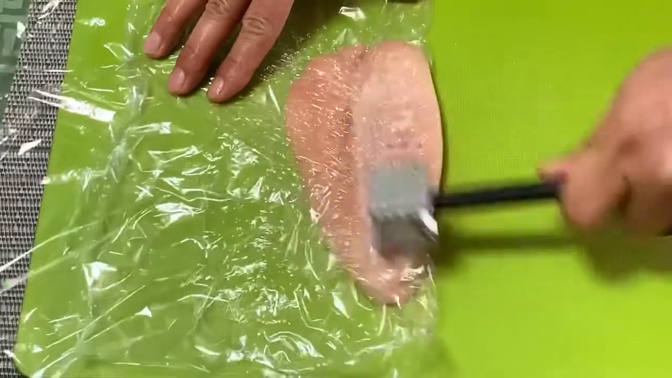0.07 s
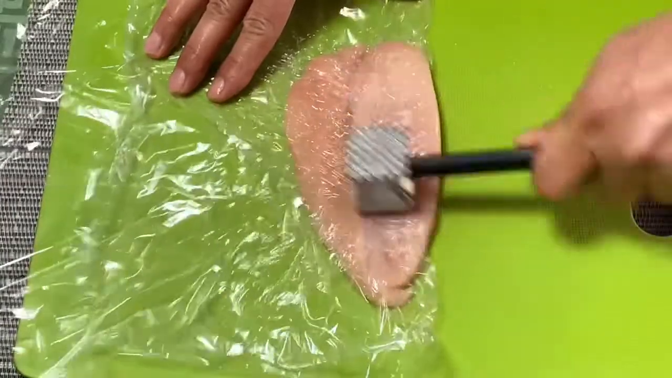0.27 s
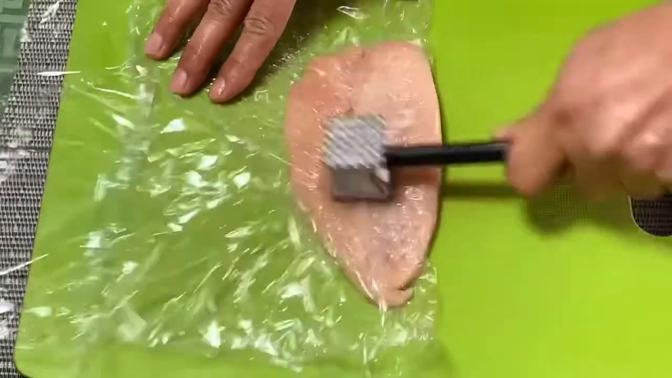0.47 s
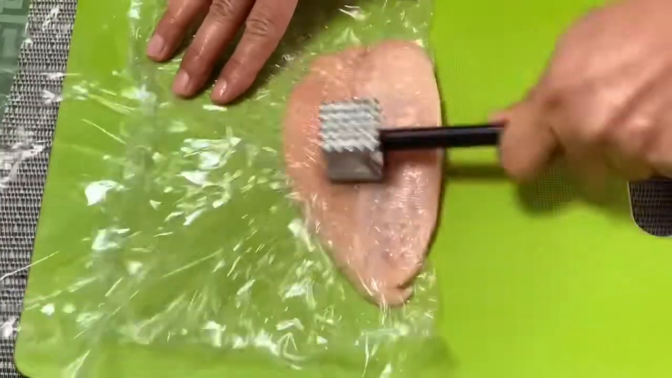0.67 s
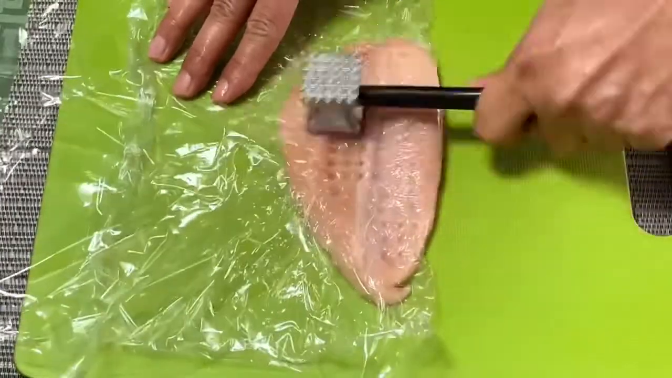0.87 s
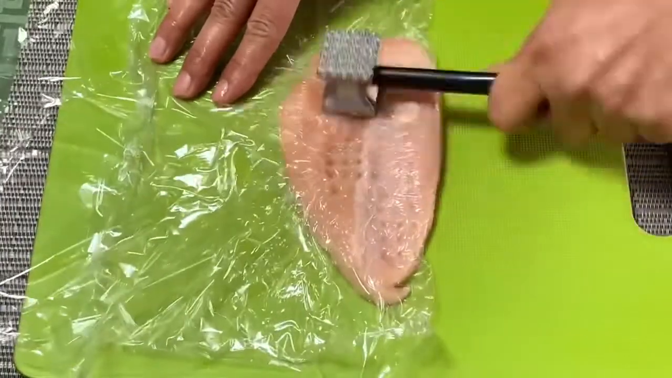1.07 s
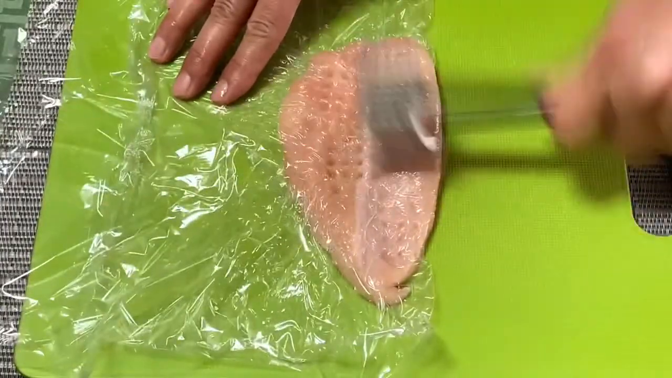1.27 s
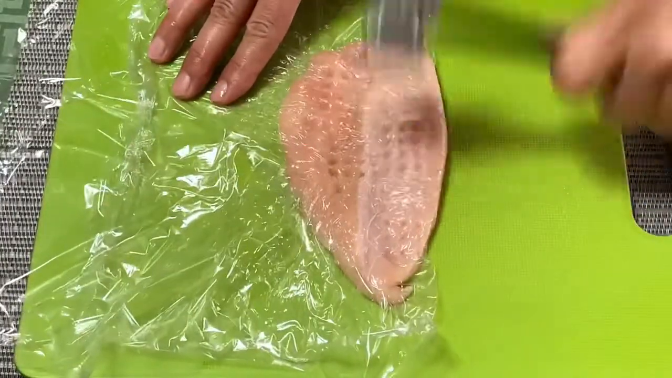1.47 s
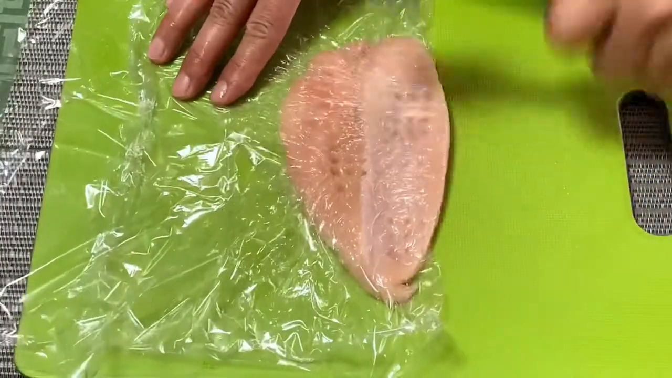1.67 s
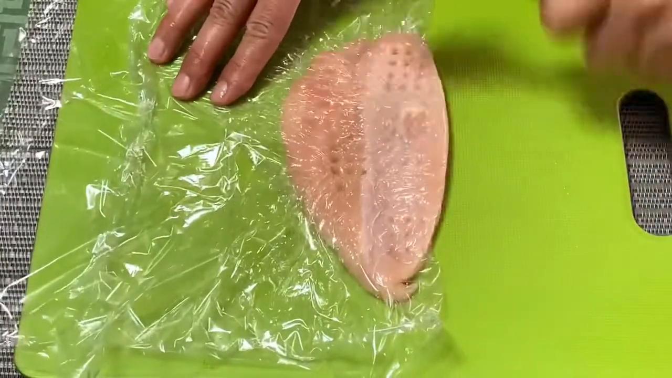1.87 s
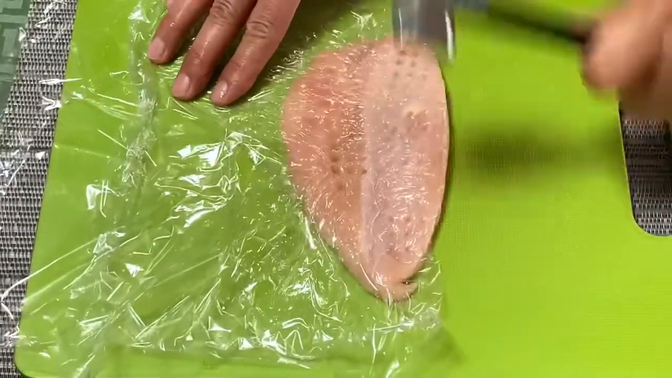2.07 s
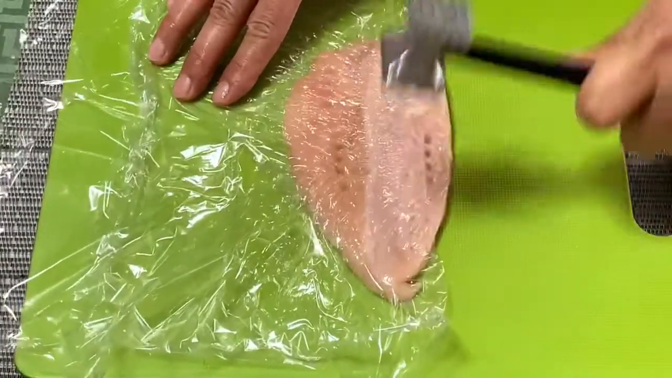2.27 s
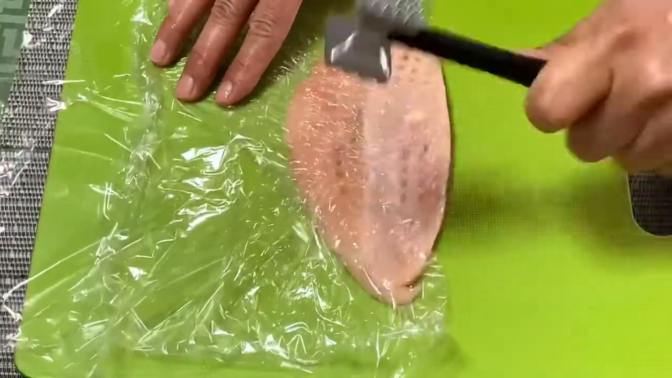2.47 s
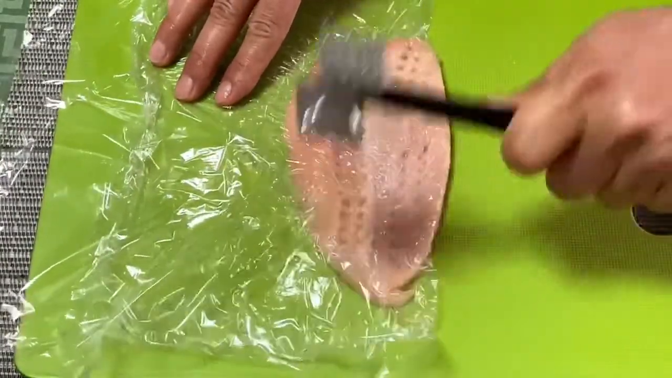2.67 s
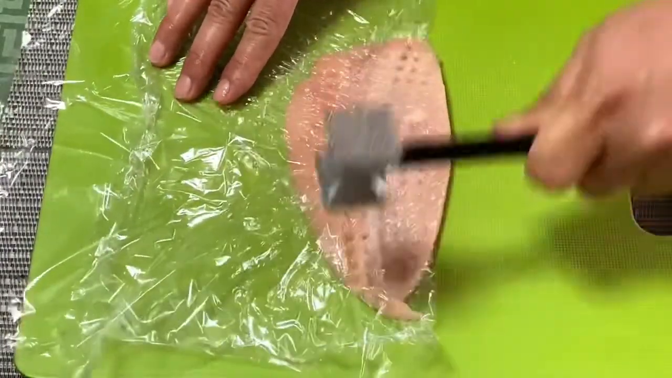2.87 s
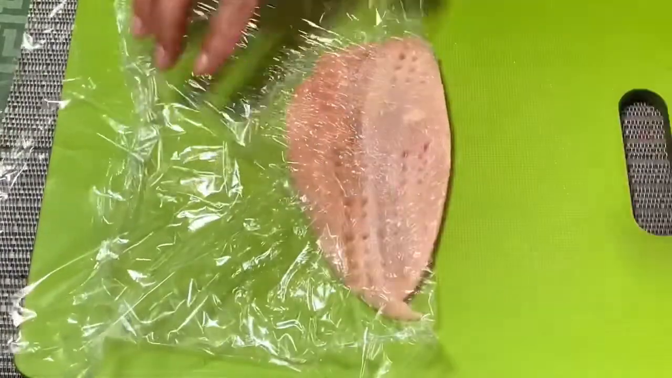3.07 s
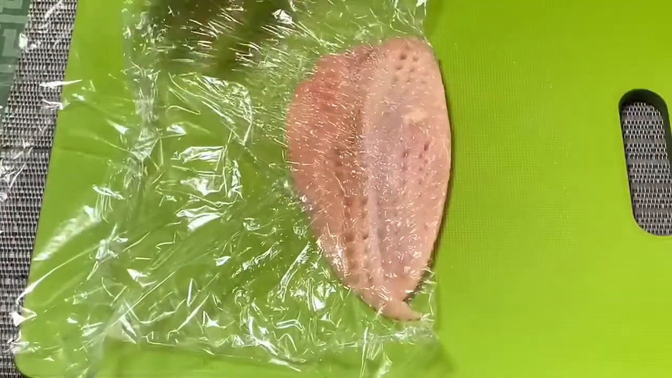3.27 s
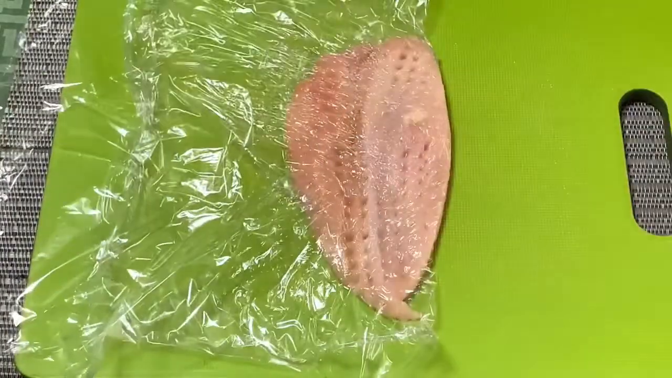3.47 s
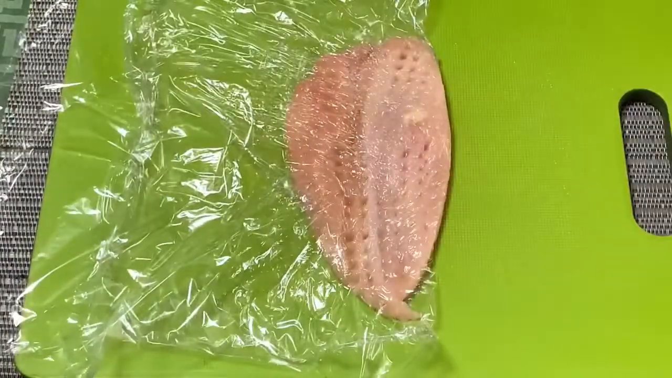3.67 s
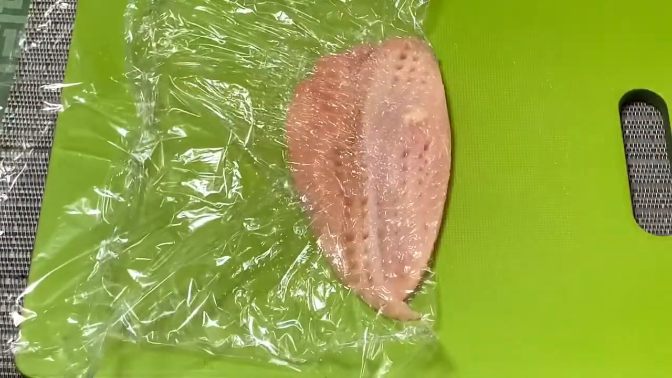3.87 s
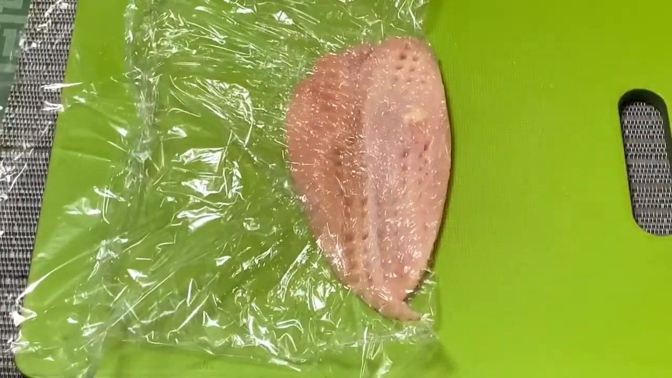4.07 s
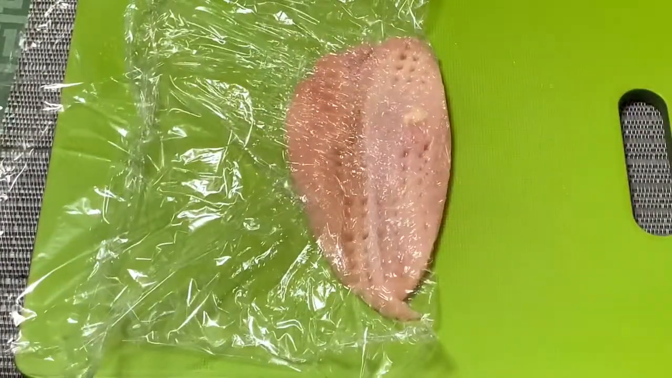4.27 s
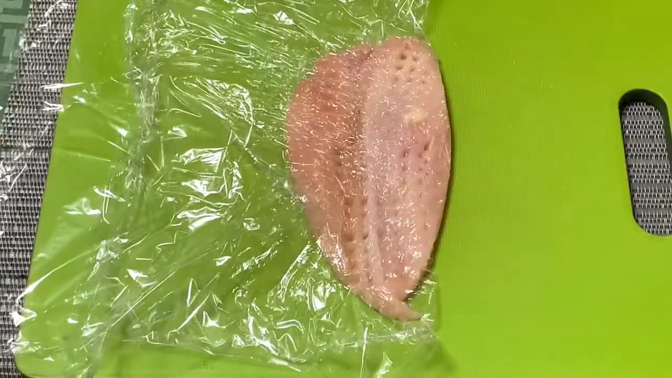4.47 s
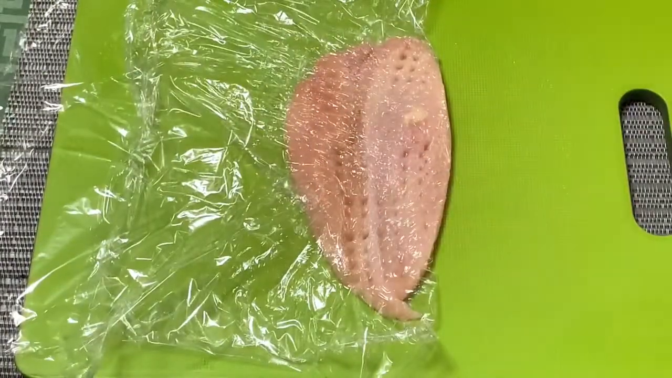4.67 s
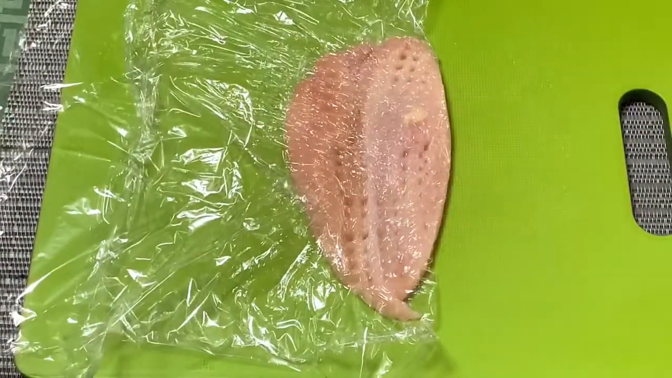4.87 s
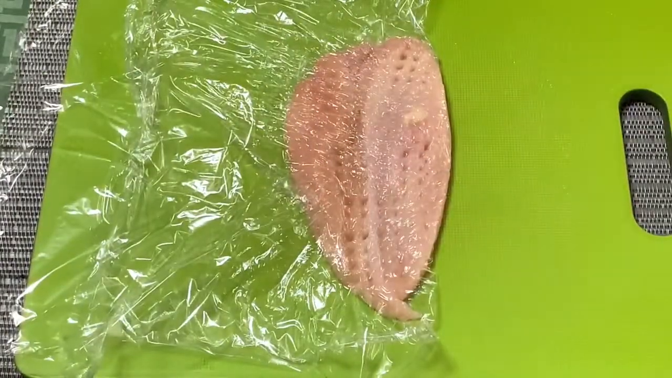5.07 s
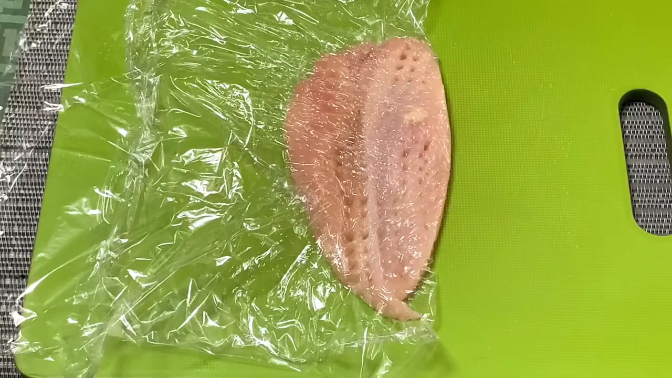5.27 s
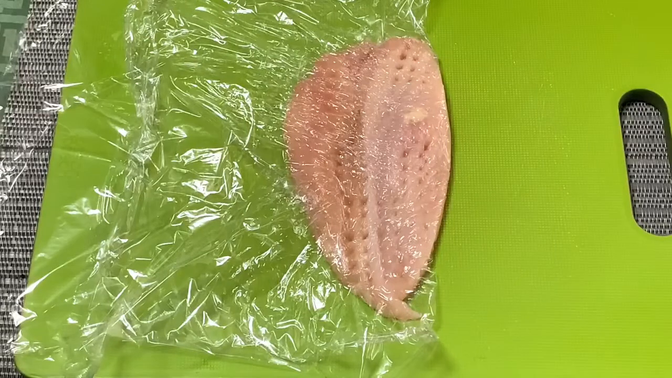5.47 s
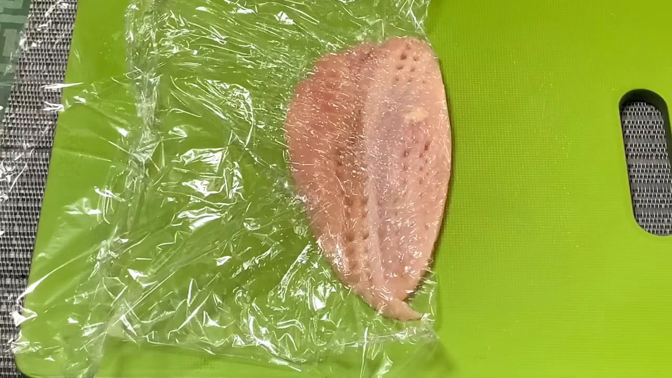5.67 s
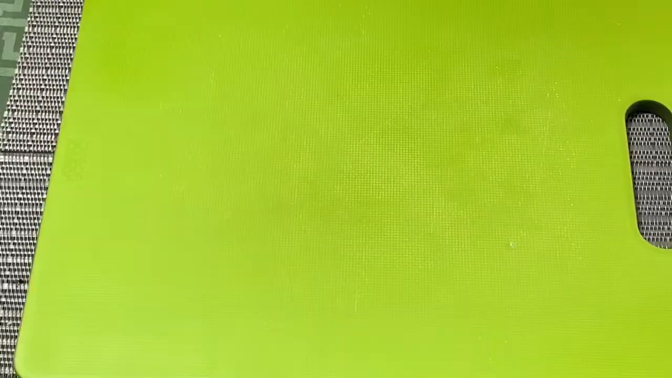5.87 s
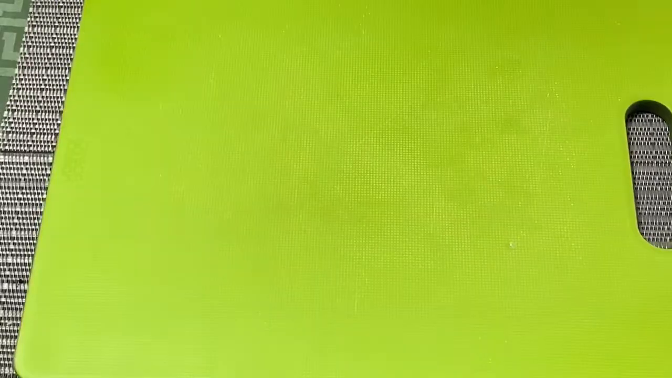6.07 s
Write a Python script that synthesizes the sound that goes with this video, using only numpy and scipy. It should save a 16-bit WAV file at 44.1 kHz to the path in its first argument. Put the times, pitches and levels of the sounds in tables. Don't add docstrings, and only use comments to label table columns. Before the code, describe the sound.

A metal mallet pounds raw chicken under plastic film on a plastic board, booming steadily, then stops, leaving faint hum, rustling and small snaps.

```python
import sys
import numpy as np
from scipy import signal
from scipy.fft import rfft, irfft
from scipy.io import wavfile
from scipy.ndimage import uniform_filter1d

SR = 44100
rng = np.random.default_rng(int(sys.argv[2]) if len(sys.argv) > 2 else 0)


def wav_out(sig):
    wavfile.write(sys.argv[1], SR, np.round(np.clip(np.atleast_2d(sig).T, -1, 1) * 32767).astype(np.int16))


def decibels_to_gain(level_db):
    exponent = np.asarray(level_db, float) / 20
    return 10 ** exponent


N = 269450
LEAD, TAIL = 2048, 24000
SMACK_PEAK_S = 0.02


def unit(x):
    return x / np.sqrt(np.mean(x ** 2))


def shape(x, db_of):
    size = x.shape[-1]
    hz = np.maximum(np.fft.rfftfreq(size, 1 / SR), 1)
    return irfft(rfft(x) * decibels_to_gain(db_of(hz)), size)


def along(table, column=1):
    rows = np.array(table)
    return lambda hz: np.interp(np.log(hz), np.log(rows[:, 0]), rows[:, column])


def bell(centre_hz, width_hz):
    return lambda hz: -10 * np.log10(1 + (2 * (hz - centre_hz) / width_hz) ** 4)


def fade(t, t60_s):
    return np.exp(-np.log(1000) * t / t60_s)


def walk(rate_hz):
    k = int(SR / rate_hz)
    steps = np.repeat(rng.standard_normal(N // k + 1), k)
    smooth = uniform_filter1d(uniform_filter1d(steps, k), k)
    return unit(smooth[:N])


def add(out, sound, start_s):
    i = LEAD + int(start_s * SR)
    out[:, i:i + sound.shape[-1]] += sound


def ports(common, opposite, share):
    return np.array([common + share * opposite, common - share * opposite])


def ring(modes, t, scatter_db, delay_s, swell_s, punch=0., turn=0.):
    hz, db, t60_s = np.transpose(modes)[:, :, None]
    detune, scatter, offset = rng.standard_normal((3, len(modes), 1))
    age = np.maximum(t - delay_s, 0)
    phase = 2 * np.pi * hz * (1 + 0.006 * detune) * age
    size = decibels_to_gain(db + scatter_db * scatter) * fade(age, t60_s)
    mid = (size * np.sin(phase)).sum(axis=0)
    side = (size * offset * np.cos(phase)).sum(axis=0)
    early = 1 + punch * fade(age, 0.067)
    return ports(mid, side, turn) * (1 - np.exp(-age / swell_s)) * early


def follow(rule, boom_db, board_db, smack_db):
    usual_boom_db, usual_board_db, usual_smack_db = -8, -8, -7
    departure_db = [boom_db - usual_boom_db, board_db - usual_board_db, smack_db - usual_smack_db]
    return rule[0] + np.dot(rule[1:], departure_db)


def answer(t):
    # hz, level_db_per_hz, t60_s, side_share
    kitchen = [(204.4, 0.5, 0.45, 0.084), (523, -0.5, 0.32, 0.5), (920, -11.5, 0.34, 1),
               (1860, -22.5, 0.33, 0.733), (3700, -24, 0.26, 1), (7270, -30, 0.34, 1),
               (9850, -35, 0.22, 0.44), (15070, -45, 0.25, .9)]
    out = np.zeros((2, len(t)))
    for hz in 210 * 2 ** np.arange(0, 6.3, .5):
        mid, side = unit(shape(rng.standard_normal((2, len(t))), bell(hz, hz * 0.51)))
        both = ports(mid, side, along(kitchen, column=3)(hz))
        level = decibels_to_gain(along(kitchen)(hz)) * np.sqrt(hz / 500)
        out += level * fade(t, along(kitchen, column=2)(hz)) * both
    return out


def blow(stroke, landing, slap_hz, low_tail, high_tail):
    # hz, level_db, t60_s
    low_modes = [(129, -32.5, 0.26), (144.3, 0, 0.31)]
    # hz, level_db, t60_s
    cabinet_modes = [(41, -3.5, 0.18), (56, 2, 0.1695)]
    # hz, level_db, t60_s
    second_modes = [(183.1, -2, 0.37), (205.5, -1, 0.2), (235.9, -13, 0.31)]
    # hz, level_db, t60_s
    knock_modes = [(283, -2, 0.135), (311, -2.5, 0.21), (331.2, 2, 0.13), (350.6, -5.5, 0.31),
                   (400, -4, 0.2), (457, 0, 0.13)]
    # hz, level_db, t60_s
    board_modes = [(441.6, 5, 0.14), (489, -24.5, 0.17), (532.5, -3, 0.2), (569, -7.5, 0.081),
                   (633, -4, 0.2), (690.7, -3.5, 0.18), (805, -18, 0.083), (830, -20, 0.089),
                   (881, -6, 0.13)]
    thud_lag_s, scatter_db = .0006, 2.5
    bend_hz, bend_s = 2470, .0017

    _, boom_db, smack_db, smack_hz, slap_db = stroke
    board_db, chirp_db = landing[:2]
    second_db = follow((-8.5, 0.48, 0.41, -0.15), boom_db, board_db, smack_db)
    knock_db = follow((-10, 1.04, 0.63, -0.51), boom_db, board_db, smack_db)
    crackle_db = follow((-33.5, 0.25, 0.19, 0.21), boom_db, board_db, smack_db)

    t = np.arange(TAIL) / SR
    since_peak = t - SMACK_PEAK_S
    noise = rng.standard_normal((3, TAIL))
    squeeze = np.where(since_peak < 0, np.exp(since_peak / 0.00061), fade(since_peak, 0.007))
    squirt = unit(shape(noise[:2], bell(smack_hz, 1400)))
    squirt = squirt + .5 * unit(shape(noise[:2], bell(8834, 10000)))
    film = decibels_to_gain(smack_db - 7.5) * squeeze * ports(squirt[0], squirt[1], 1.0)
    lead_swell = (since_peak < 0) * np.exp(np.minimum(since_peak, 0) / 0.0046)
    faint_lead = lead_swell * unit(shape(noise[1::-1], bell(4010, 5500)))
    film = film + decibels_to_gain(smack_db - 24.5) * faint_lead

    push = np.maximum(since_peak - thud_lag_s, 0)
    turns = low_modes[-1][0] * push + bend_hz * bend_s * (1 - np.exp(-push / bend_s))
    sharp = decibels_to_gain(chirp_db - 26) * (1 - np.exp(-push / 0.0019)) * fade(push, .03)
    heavy = decibels_to_gain(boom_db + 15) * (1 - np.exp(-push / 0.0043)) ** 2 * fade(push, 0.029)
    chirp = np.sin(2 * np.pi * turns) * (sharp + heavy)

    age = np.maximum(since_peak + .001, 0)
    wet = unit(shape(noise[2], bell(slap_hz, 2300)))
    slap = decibels_to_gain(slap_db + 5) * fade(age, 0.033) * (1 - np.exp(-age / 0.0006)) * wet

    late = since_peak - thud_lag_s + .003
    counter = decibels_to_gain(boom_db + 8) * ring(low_modes, late, 1.07, .0089, .0035, 0.44, .05)
    counter += decibels_to_gain(boom_db - 5) * ring(cabinet_modes, late, 1.2, 0.015, 0.0052)
    counter += decibels_to_gain(second_db + 2.0) * ring(second_modes, late, 2.64, .0042, 0.0039, 0.64, 0.1)
    counter += decibels_to_gain(knock_db - 3.5) * ring(knock_modes, late, scatter_db, .0059, 0.0035, 2.26, 0.21)
    counter += decibels_to_gain(board_db - 8.0) * ring(board_modes, late, scatter_db, .0044, 0.0009, 1.53, 0.54)

    clusters = np.repeat(rng.exponential(size=TAIL // 60), 60)
    patchy = uniform_filter1d(clusters, size=40)
    high_tail = high_tail * decibels_to_gain(2.2 * (patchy - 0.5) * fade(age, 0.27))
    arrive = 1 - np.exp(-age / 0.0031)
    room = arrive * (decibels_to_gain(board_db - 10) * low_tail + decibels_to_gain(crackle_db + 3.5) * high_tail)
    pan_db = 0.3 * np.array([[1], [-1]])
    return decibels_to_gain(pan_db / 2) * (film + slap + chirp) + counter + room


def spot_knock(stroke, landing, spot_hz, t):
    # usual_db, then db_per_db of boom, board, smack
    high_rule = (-7, -1.7, 1, 0.4)
    t60_s = 0.19
    board_db, _, low_db = landing
    low_hz, high_hz, _ = spot_hz
    high_db = follow(high_rule, stroke[1], board_db, stroke[2])
    modes = [(low_hz, low_db, t60_s), (high_hz, high_db, 0.95 * t60_s)]
    return decibels_to_gain(-10) * ring(modes, t - SMACK_PEAK_S, 0, .0035, 0.00088, 0, .3)


def mallet(out):
    # film_peak_s, boom_db, smack_db, smack_hz, slap_db
    strokes = [(-.015, -12, -13, 7000, -32), (0.198, -10, -1.5, 7300, -11), (0.4131, -8, -3, 7300, -13.5),
               (0.617, -9.5, -3, 6300, -23.5), (0.836, -9, -6.5, 6400, -17), (1.04, -7.5, -7.5, 7640, -13),
               (1.2614, -7.5, -8.5, 6640, -18.5), (1.4762, -6.5, -7, 9350, -10.5),
               (1.6783, -4.5, -9.5, 7040, -19), (1.883, -6.5, -13, 9220, -22),
               (2.0941, -16.5, -20.5, 4570, -22), (2.2941, -12.5, -13, 4440, -25.5),
               (2.5315, -10.5, -4, 6800, -11), (2.737, -9, -1, 7350, -21.5)]
    # board_db, chirp_db, low_knock_db
    landings = [(-3, 0, -9), (-4, 4, 0), (-5, -11.5, -9.5), (-4, 1.5, -3), (-15, -16, -9),
                (-12.5, -12.5, -5.5), (-6, -16, -2.5), (-7, 4.5, -1), (-8.5, 9, -2), (-6.5, 17.5, -3),
                (-13, -3, 0), (-11.5, -14, -1.5), (-6.5, 9, -2.5), (-2, 2, -0.5)]
    # low_knock_hz, high_knock_hz, slap_hz
    spots_hz = [(389, 682, 1400), (323, 543, 2000), (320, 557, 1100), (396, 500, 1000), (323, 667, 1900),
                (320, 505, 2300), (318, 539, 1900), (250, 467, 1100), (323, 462, 1500), (318, 534, 1800),
                (310, 662, 2200), (315, 690, 2200), (323, 669, 1900), (388, 477, 1600)]
    t = np.arange(TAIL) / SR
    taper = np.minimum(1, (t[-1] - t) / .1)
    for stroke, landing, spot_hz in zip(strokes, landings, spots_hz):
        tail = answer(np.maximum(t - SMACK_PEAK_S, 0))
        low = shape(tail, bell(0, 3200))
        high = decibels_to_gain(15) * (tail - low)
        sound = blow(stroke, landing, spot_hz[-1], low, high)
        sound = sound + spot_knock(stroke, landing, spot_hz, t)
        add(out, taper * sound, stroke[0] - SMACK_PEAK_S)


def hum():
    # hz, level_db_per_hz
    colour = [(15, -54), (25, -8.5), (80, -15), (157, -2), (249, -22), (270, -28), (301, -13.5), (416, -23),
              (451, -19), (962, -29), (1440, -31), (2550, -36), (3080, -45), (3720, -43), (16000, -82)]
    # hz, width_hz, lift_db
    peaks = [(118.7, 4.4, 7.5), (157.2, 20.5, 5), (248.7, 29, 9), (300, 13, 3.5), (454.4, 14, 5.5),
             (800, 12, 7), (1178, 18, 8), (1480, 47, 7), (2016, 83, 5), (2623, 40, 8), (3700, 53, 7)]
    # time_s, level_db
    loudness = [(0, -31), (3, -38.5), (4.201, -38), (4.8, -37.5), (5.6, -38), (5.8, -39.5), (6.11, -46.5)]

    def drone_db(hz):
        lift_db = sum(db * decibels_to_gain(bell(peak_hz, width_hz)(hz)) for peak_hz, width_hz, db in peaks)
        return along(colour)(hz) + lift_db

    mid, side = shape(rng.standard_normal((2, N)), drone_db)
    side = shape(side, along([(60, -14.0), (150, -23), (400, -3.5), (1500, -1.0), (8000, 1.0)]))
    level_db = np.interp(np.arange(N) / SR, *np.transpose(loudness))
    both = ports(mid, side, 1) / np.std(mid)
    bass = shape(both, bell(0, 406))
    surging = decibels_to_gain(1.3 * walk(3.794)) * bass
    steady = decibels_to_gain(0.22 * walk(1.3)) * (both - bass)
    return decibels_to_gain(level_db) * (surging + steady)


def peels(out):
    # centre_s, level_db, pitch_hz, width_hz, length_s
    squeaks = [(0.397, -60, 7060, 400, 0.12), (0.594, -41.5, 2500, 354, .05),
               (0.602, -45, 3940, 350, 0.038), (0.704, -45, 3700, 300, 0.13), (3.04, -53, 800, 70, 0.15),
               (3.25, -55, 780, 110, .24), (3.818, -48, 1720, 1402, 0.15), (4.267, -39.5, 4600, 900, 0.053),
               (4.624, -45, 1597, 1800, .17), (4.86, -47.5, 4580, 1807, .3), (5.87, -52.5, 2410, 891, .12)]
    for centre_s, db, hz, width_hz, length_s in squeaks:
        size = int(length_s * SR)
        squeak = unit(shape(rng.standard_normal((2, size)), bell(hz, width_hz)))
        add(out, decibels_to_gain(db) * np.hanning(size) * squeak, centre_s - length_s / 2)


def rubbing(t):
    # loudest_s, level_db, swell_s, hold_s, scuff_hz
    rubs = [(2.95, -51, .1, .18, 1800), (3.44, -60.5, 0.27, .004, 1480), (3.75, -55, .05, 0.041, 1700),
            (3.86, -43.5, 0.15, 0.0051, 2550), (4.06, -45.5, .035, .015, 2770), (4.19, -49, .1, .01, 1720),
            (4.26, -44, .012, .02, 4800), (4.38, -50, .1, .004, 1900), (4.52, -57, 0.13, .01, 1902),
            (4.62, -56.5, .08, .08, 1900), (4.85, -46.5, 0.48, .125, 4300),
            (5.7935, -43, 0.0018, .004, 1850), (5.84, -52.5, .04, .06, 2300), (5.98, -50, .08, .15, 2300)]
    swell_db, release_db_per_s = 18.5, 191
    creep_db, still_db, creep_ends_s = -68, -78.5, 2.9
    loudest_s, db, swell_s, hold_s, scuff_hz = np.transpose(rubs)[:, :, None]
    rise_db = swell_db * np.maximum(loudest_s - t, 0) / swell_s
    fall_db = release_db_per_s * np.maximum(t - loudest_s - hold_s, 0)
    power = decibels_to_gain(2 * (db - rise_db - fall_db)) + 1e-30
    quiet = decibels_to_gain(2 * np.where(t < creep_ends_s, creep_db, still_db))
    total = power.sum(axis=0)
    return np.sqrt(total + quiet), (power * scuff_hz).sum(axis=0) / total


def rustle():
    # hz, level_db_per_hz
    colour = [(400, -26.5), (800, -8.5), (1500, -5.5), (2500, -11), (4200, -6), (7000, -7.5), (10000, -12),
              (14000, -18.5), (16000, -21.5)]
    size, scuff_hz = rubbing(np.arange(N) / SR)
    grains = rng.standard_normal((2, N)) * decibels_to_gain(2.8 * np.minimum(rng.exponential(size=N), 6))
    mid, side = unit(shape(grains, along(colour)))
    slow = unit(shape(rng.standard_normal((2, N)), bell(0, 2200)))
    phase = 2 * np.pi * np.cumsum(scuff_hz) / SR
    scuff = decibels_to_gain(-6.5) * (slow[0] * np.cos(phase) + slow[1] * np.sin(phase))
    pan_db = -0.5 * np.array([[1], [-1]])
    flicker = decibels_to_gain(0.28 * walk(25.16) - 1.57 + pan_db / 2)
    return size * flicker * ports(mid + scuff, side, 1.0)


def small_sounds(out):
    # start_s, level_db, pitch_hz, t60_s, click_gain
    snaps = [
        (4.0606, -48, 3740, 0.156, 1),
        (4.2546, -25, 4890, 0.26, 1.4),
        (4.563, -30, 3380, 0.28, 2.6),
        (4.7581, -30.5, 4040, 0.25, 1.2),
        (5.7923, -39.5, 2950, 0.054, 2.9),
        (5.9698, -31, 1670, 0.33, 0.62),
    ]
    # start_s, level_db, pitch_hz, t60_s
    bumps = [
        (3.79, -35, 56, 0.31),
        (5.965, -31.5, 333, 0.12),
    ]
    t = np.arange(TAIL // 2) / SR
    for start_s, db, hz, t60_s, click_gain in snaps:
        noise = unit(shape(rng.standard_normal((2, len(t))), bell(hz, 5030)))
        click = click_gain * rng.standard_normal(len(t)) * fade(t, 0.005)
        add(out, decibels_to_gain(db - 13) * (noise * fade(t, t60_s) + click), start_s)
    for start_s, db, hz, t60_s in bumps:
        add(out, decibels_to_gain(db) * ring([(hz, 0, t60_s)], t, 0, 0, 0.0047), start_s)


def scene():
    out = np.zeros((2, LEAD + N + TAIL))
    mallet(out)
    peels(out)
    small_sounds(out)
    return out[:, LEAD:LEAD + N] + hum() + rustle()


def roll_off(x):
    return signal.sosfilt(signal.butter(12, 16520, fs=SR, output="sos"), x)


def record(dry):
    # hz, share_db
    shared = [(4000, -18), (7000, -22), (8600, -13), (10000, -2), (11500, 2), (16000, 8.5)]
    # hz, gain_db
    response = [(20, -19), (45, 0), (8000, -1), (10200, 2.5), (13500, 1), (14500, -0.5), (15600, -4),
                (16400, -22)]
    # hz, difference_db
    tilt = [(30, -1.6), (70, -0.7), (150, -1.7), (300, 0), (16000, 0.82)]
    split_hz, left_lag_samples, knee = 3000, 13, 9.0

    def own_db(hz):
        share = decibels_to_gain(2 * np.minimum(along(shared)(hz), -.05))
        return 10 * np.log10(1 - share * (hz > split_hz))

    padded = np.pad(dry, ((0, 0), (0, LEAD)))
    common = shape(padded.sum(axis=0) / np.sqrt(2), along(shared))
    common = shape(common, lambda hz: -200 * (hz <= split_hz))
    mixed = shape(padded, own_db) + np.array([np.roll(common, left_lag_samples), common])
    left = shape(mixed[0], lambda hz: along(response)(hz) + along(tilt)(hz) / 2)
    right = shape(mixed[1], lambda hz: along(response)(hz) - along(tilt)(hz) / 2)
    tilted = np.array([left, right])[:, :N]
    flattened = tilted / (1 + np.abs(tilted) ** knee) ** (1 / knee)
    return roll_off(flattened)


dry = scene()
out = record(dry)
wav_out(out)
```